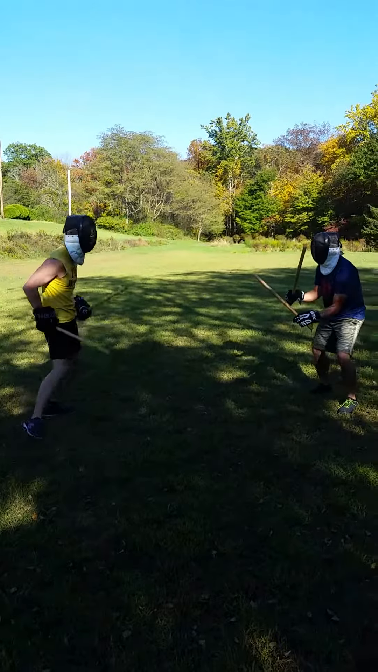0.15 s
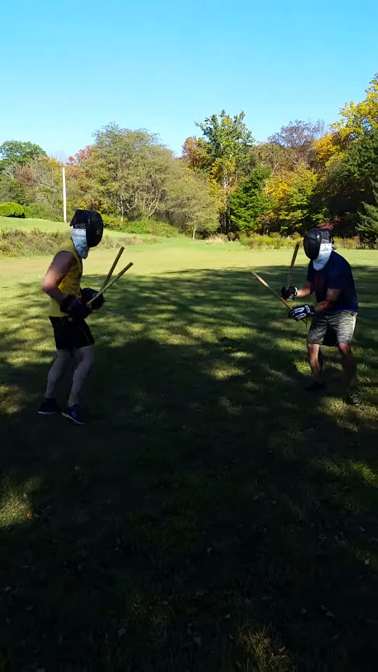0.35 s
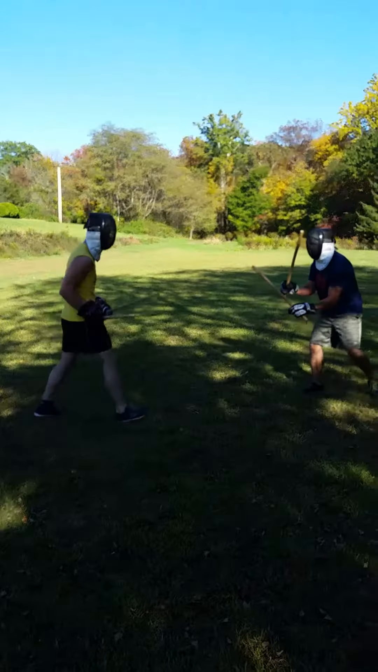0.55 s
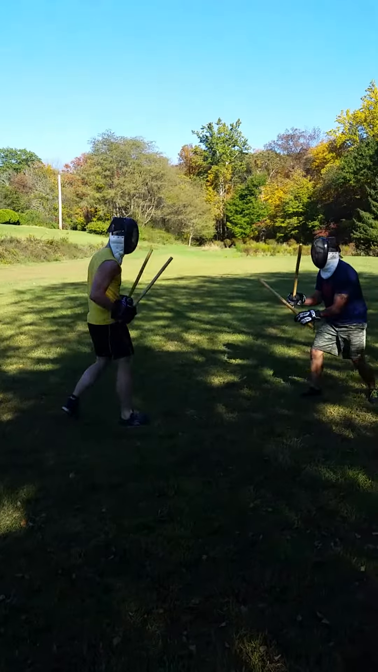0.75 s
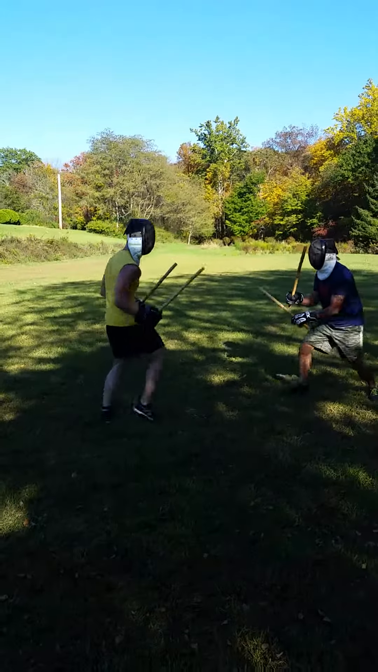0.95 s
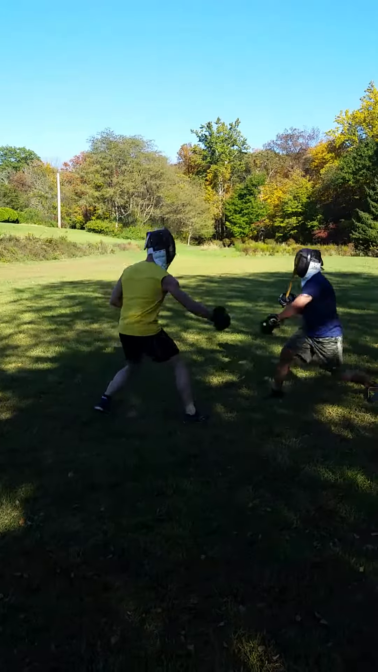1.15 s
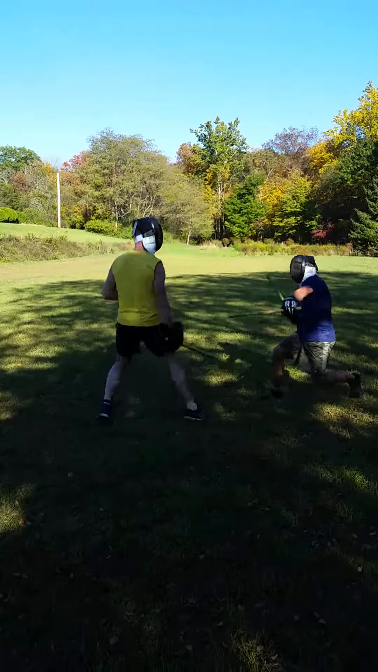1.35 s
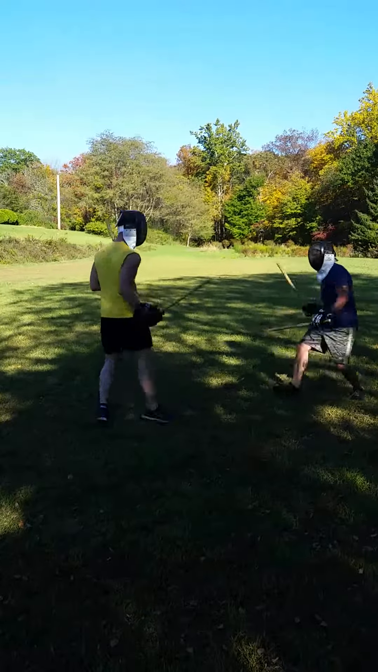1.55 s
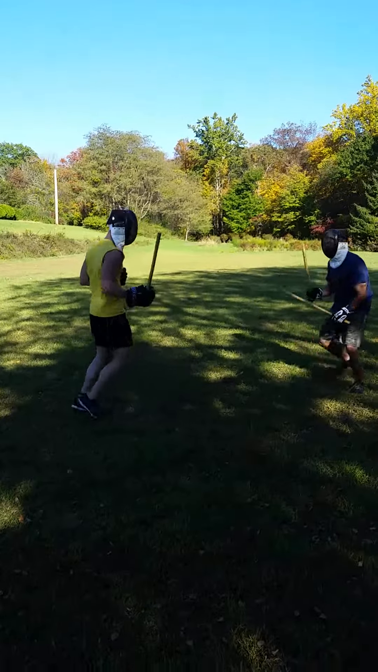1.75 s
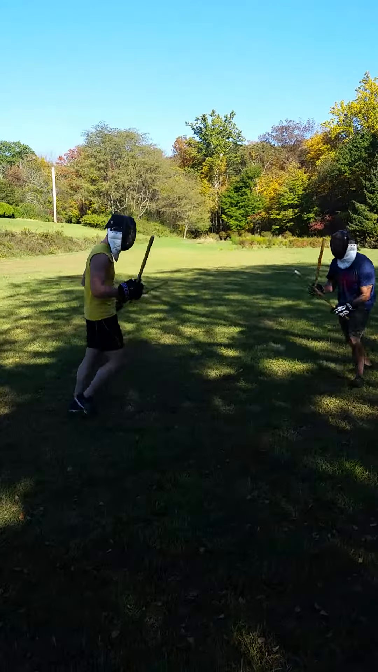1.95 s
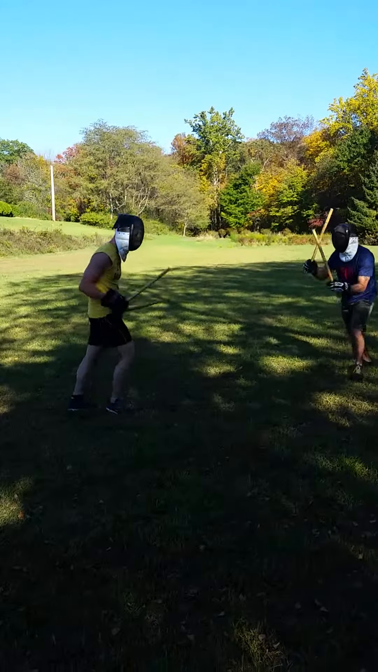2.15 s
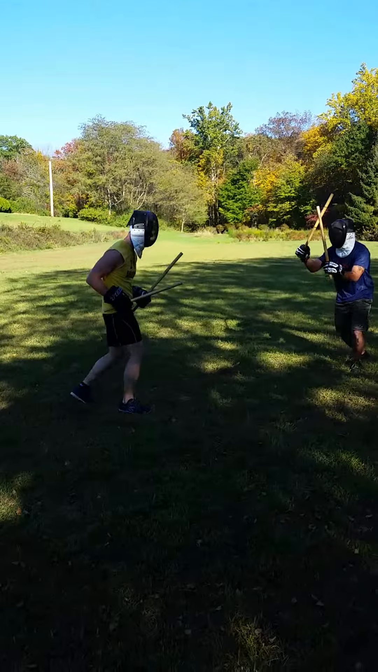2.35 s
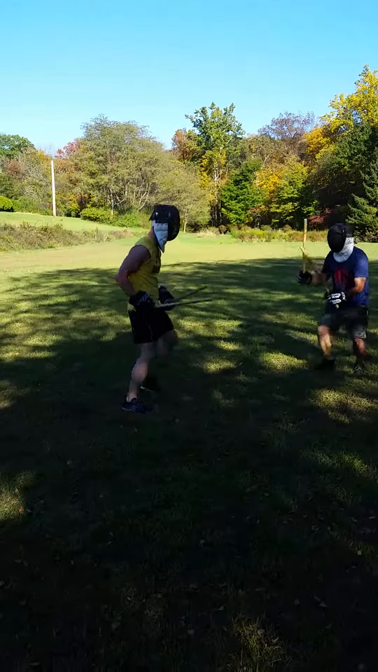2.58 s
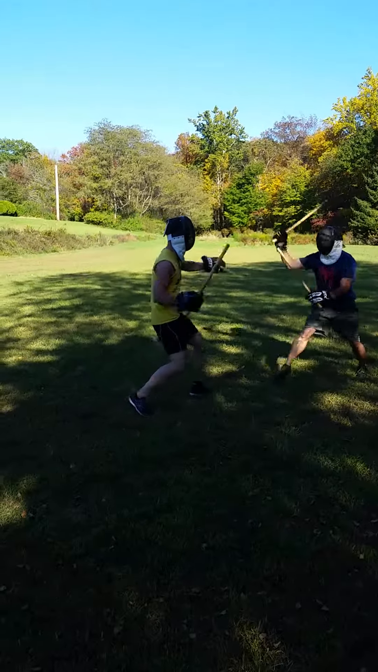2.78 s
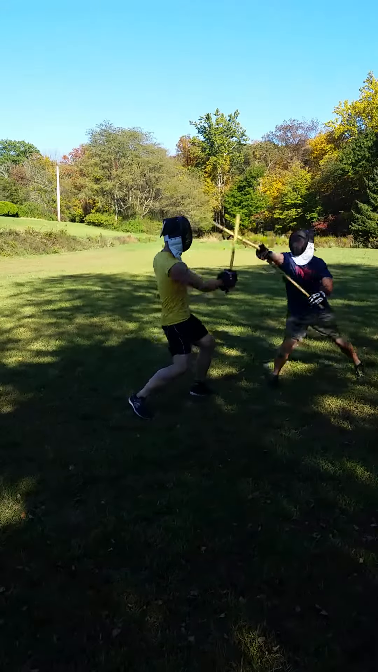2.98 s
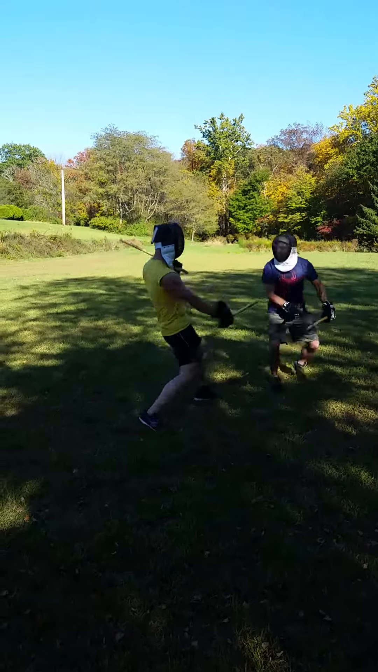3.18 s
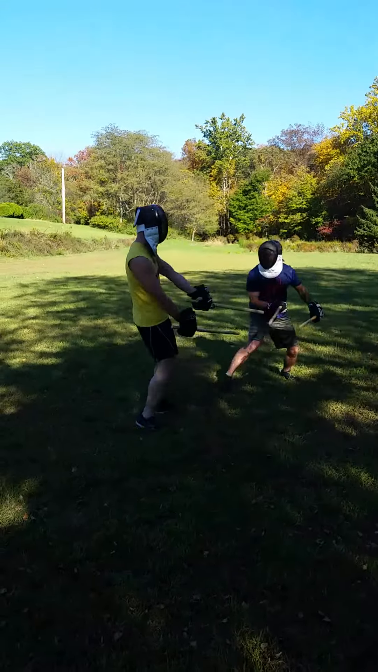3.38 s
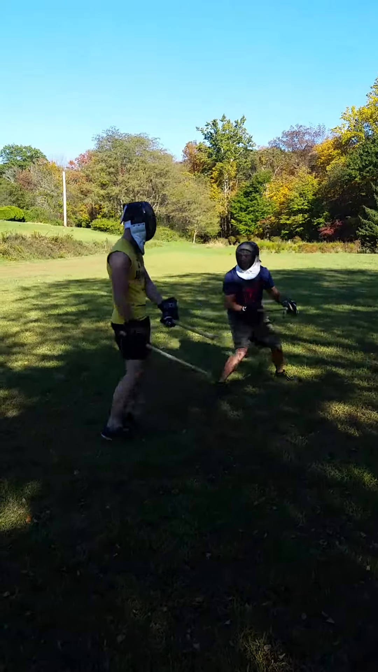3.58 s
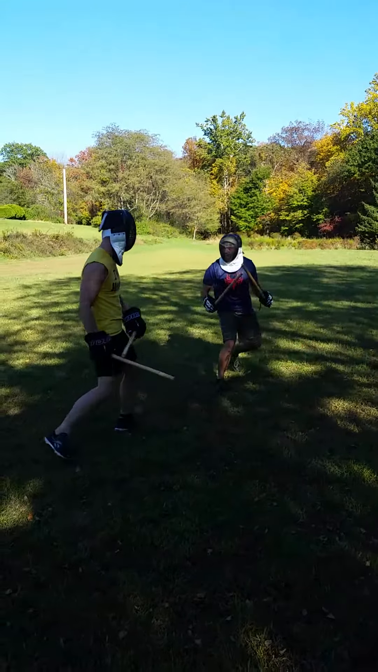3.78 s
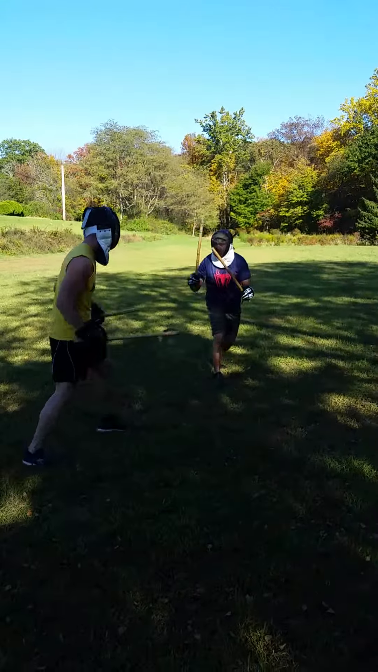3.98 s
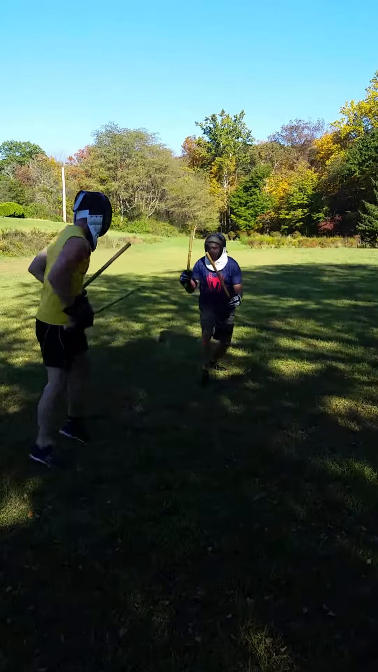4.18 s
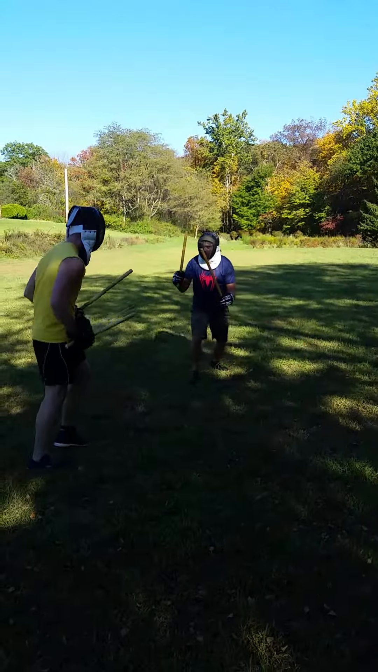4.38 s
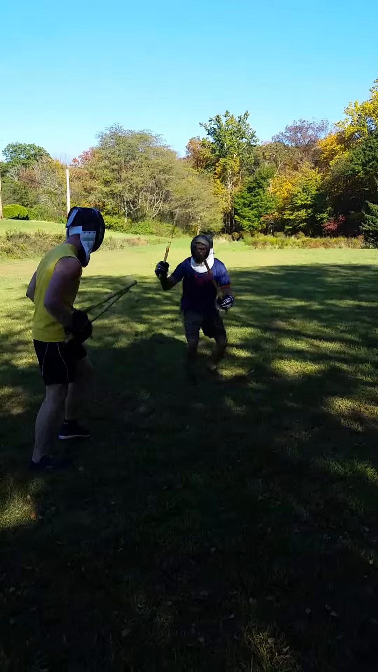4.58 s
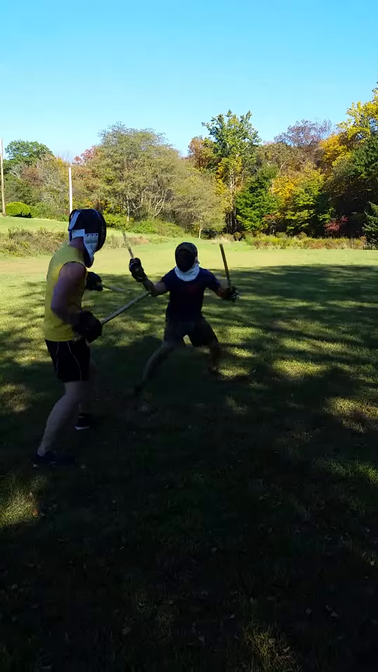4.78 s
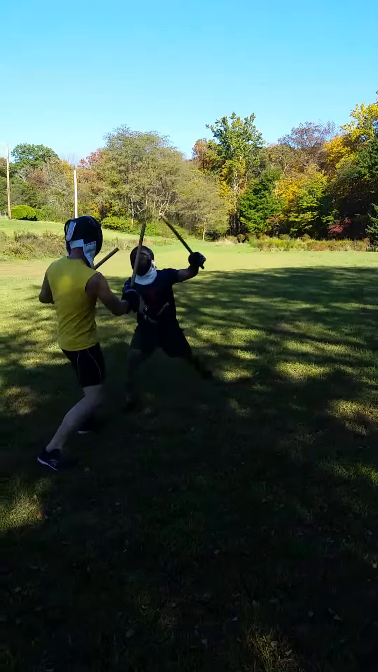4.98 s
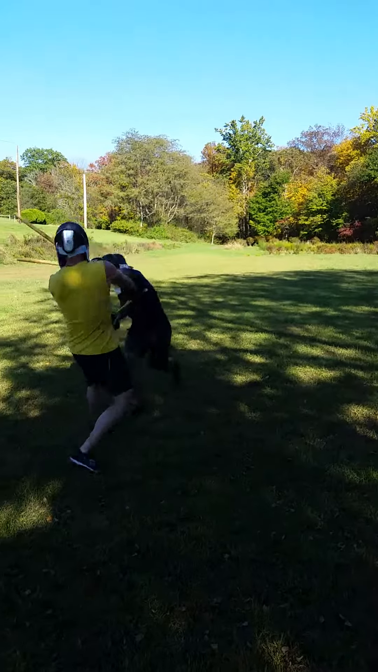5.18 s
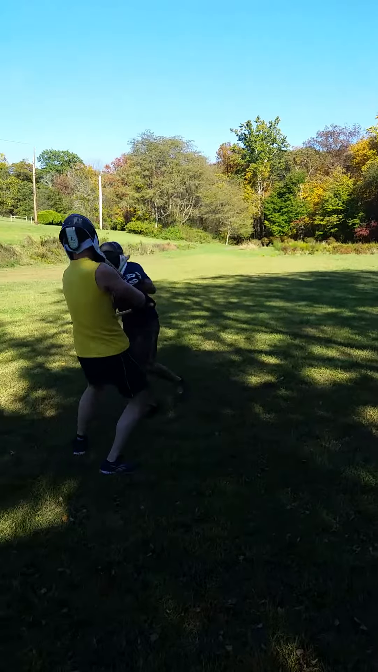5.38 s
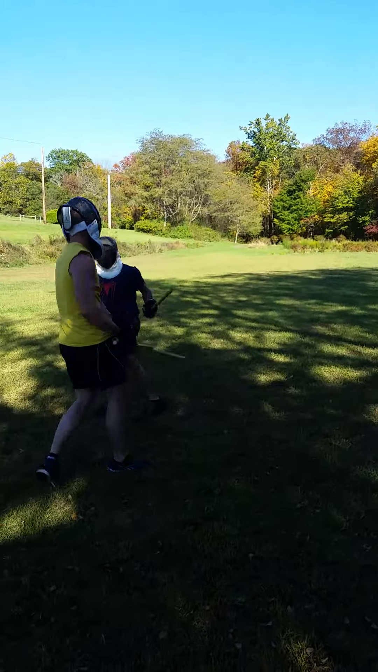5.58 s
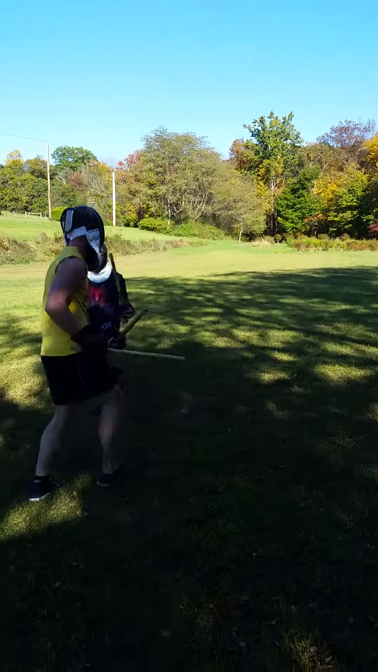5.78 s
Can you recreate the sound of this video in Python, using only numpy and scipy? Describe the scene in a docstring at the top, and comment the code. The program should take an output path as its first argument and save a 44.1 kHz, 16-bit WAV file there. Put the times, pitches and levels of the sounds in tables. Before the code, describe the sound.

Over a low handling rumble and a faint trill of insects, two wooden sticks clack sharply in three irregular bursts, the last being the longest. Feet thud on turf and the sticks swish softly between hits, with a light echo from distant trees. The field is heard clearly on the left and muffled on the right, where a hand bumps the microphone, loudest after the first burst and again during the last.

```python
"""Wooden sticks clack as two fighters spar on grass: each blow cracks and sets both sticks ringing,
and the ground, nearby foliage and far tree line scatter it back. Sticks, clothes and feet swish and
thud, and one cricket sings close by. Distant insects, outdoor hush and microphone hiss dip and return
as the gain of the hand-held camera shifts. Its open left port hears the field, while the covered
right port hears it muffled and picks up the rumble and bumps of the hand."""
import sys
import numpy as np
from scipy import signal
from scipy.fft import rfft, irfft
from scipy.io import wavfile

SR = 44100
rng = np.random.default_rng(int(sys.argv[2]) if len(sys.argv) > 2 else 0)


def wav_out(sig):
    """Save sig, one row per channel (or a flat mono array), as 16-bit PCM at SR to the path in sys.argv[1]."""
    wavfile.write(sys.argv[1], SR, np.round(np.clip(np.atleast_2d(sig).T, -1, 1) * 32767).astype(np.int16))


N = 257544

# Stick clacks, and one sharp slap back off the foliage at 3.13 s.
# The contact point is a share of the stick's length; the grip shifts the pitch:
# start_s, level_db, body_db, brightness_db, contact_share, pitch_ratio, echo_db
CLACKS_AND_SLAP = [(1.288, -25.5, -1, 4.5, 0.099, 1.01, 3), (1.3315, -28.5, 11, -3, 0.061, 1.05, -11),
                   (1.3961, -40, 0.5, -21, 0.29, 1.17, 8), (2.944, -61.5, -1, 12.5, 0.25, 0.78, 4),
                   (3.0936, -27, -7.5, 4.5, 0.23, 1.01, 3), (3.1333, -37, -2.5, 7.5, 0.024, 0.92, -17),
                   (3.4737, -24.5, -6, -6, 0.017, 0.95, -1), (3.926, -58, -8, -8, 0.45, 1.0, 4),
                   (4.688, -54, 4.5, -15, 0.071, 0.93, -4), (4.7072, -38.5, -1, -12.5, 0.098, 0.92, -2),
                   (4.9818, -24.5, -5.5, -1, 0.294, 0.96, 8), (5.0118, -28.5, -5.5, 2.5, 0.51, 1.006, 3.5),
                   (5.1929, -34.5, 1.5, -4, 0.45, 0.99, -3), (5.281, -31, -1.5, 4, 0.46, 0.98, -4),
                   (5.3098, -37.5, -2.5, -8, 0.43, 1.06, 1), (5.433, -28.5, 4, -4, 0.039, 1.066, 1.5)]
# Centres of a clack's body, middle, edge and snap: frequency_hz
CLACK_BANDS_HZ = [600, 1800, 4000, 7500]
# Bending modes of each stick, lowest first: pitch_hz, level_db
FIRST_STICK_MODES = [(230.0, -9), (612.0, -0.5), (1089.0, -2), (1688.0, 1.5), (2202.0, -2), (2851.0, -5),
                     (3596.0, -41.5), (4297.0, -7.5), (5203.0, -12), (6697.0, -10), (7785.0, 1)]
SECOND_STICK_MODES = [(368.0, -7), (718.0, 1), (1240.0, -3.5), (1534.0, -7), (2086.0, -11), (2425.0, -5.5),
                      (3144.0, -5.5), (3806.0, -1.5), (4498.0, -4.5), (5850.0, -7), (8449.0, -6.5)]
# Wooden tone common to all clacks: frequency_hz, gain_db
WOOD_TONE = [(60, -26.5), (150, 5.5), (280, 3.5), (420, 4.5), (620, 5), (2000, 6.5), (5000, 7.5),
             (8500, 1.5), (10000, -9.5), (15000, -13)]
# Tone of the echoes from nearby foliage and from the far tree line: frequency_hz, gain_db
FOLIAGE_TONE = [(200, -5), (700, -0.5), (1500, -3.5), (3000, -1.5), (4300, -1), (5400, -3.5), (6400, -2.5),
                (8500, 0.5), (14000, -3)]
TREE_LINE_TONE = [(200, -28), (700, -2), (2200, -0.5), (4000, -8.5), (8000, -10.5), (14000, -14)]

# Feet on turf and blows on padding: start_s, level_db, pitch_hz, hardness_db
SOFT_IMPACTS = [(.77, -31.5, 100, -23), (1.235, -33, 124, -20), (1.332, -17, 220, -22),
                (1.399, -28.5, 177, -18), (5.062, -28, 140, -12)]
# Sticks cutting the air; shoes and cloth brushing the grass: centre_s, length_s, level_db
STICK_SWINGS = [(0.987, 0.014, -50), (2.804, 0.084, -45), (4.691, .012, -42)]
GRASS_RUSTLES = [(.985, .05, -59), (1.19, 0.079, -58.5), (2.793, 0.31, -59), (3.792, 0.12, -60),
                 (4.704, 0.16, -64)]
# Spectra of that rushing air and brushed grass: frequency_hz, level_db
AIR_SPECTRUM = [(100, -8.5), (400, -3), (750, 1.5), (1400, -4), (2200, -20), (5000, -13.5), (10000, -45)]
GRASS_SPECTRUM = [(1000, 10.5), (3000, 1.5), (5000, -2), (8300, 6.5), (10000, -1.5), (15000, -5.5)]

# The hand bumps the camera: start_s, level_db, pitch_hz, hardness_db
HAND_BUMPS = [(2.129, -21, 68, -55), (2.1995, -3, 73.4, 3), (2.693, -20.5, 75, -1), (3.5715, -18, 69, 2),
              (5.291, -26.5, 90, 7), (5.3165, -9.5, 95.4, -27), (5.4535, -6.5, 97, -39)]
# The camera shell dulls each bump: frequency_hz, gain_db
SHELL_TONE = [(20, 20), (60, 3), (400, -3), (900, 5.5), (1500, -19.5), (4000, -24), (15000, -48)]
# How much the hand shifts on the camera: time_s, level_db
RUMBLE_LEVEL = [(0, -34), (0.6, -35.5), (0.92, -31), (1.2, -36.5), (2.0, -38), (2.72, -30), (3.15, -34),
                (3.35, -39), (4.0, -40), (4.15, -33), (4.55, -28.5), (5.1, -31.5), (5.84, -38.5)]
# Rumble of the shifting hand: frequency_hz, level_db
RUMBLE_SPECTRUM = [(20, -5), (35, -3.5), (70, 1), (100, -5.5), (125, -12), (180, -26), (250, -38),
                   (500, -46), (1200, -57), (3000, -62.5), (6000, -79), (15000, -78)]
# Paths through the body to the open port, and through the cover to the other: frequency_hz, gain_db
BODY_LEAK = [(60, -40.5), (150, -36), (320, -30.5), (480, -36), (800, -44), (15000, -43)]
PORT_COVER = [(100, -3), (700, -9.5), (1200, -14), (2500, -18.5), (4500, -30.5), (8000, -47.5),
              (15000, -19)]

# The whole background dips and returns as the camera's gain shifts, and the hush also fades over the first half
# second; one curve for the treble (insects, microphone hiss), one for the hush: time_s, gain_db
TREBLE_GAIN = [(0, -58.5), (0.7, -65.5), (1.2, -58), (2.1, -63.5), (3.05, -59.5), (3.35, -69.5),
               (4.05, -74), (4.6, -61.5), (5.3, -59), (5.84, -67.5)]
HUSH_GAIN = [(0, -56), (0.5, -65), (1.6, -62), (2.2, -66.5), (3.0, -64.5), (3.35, -68.5), (4.05, -70.5),
             (4.9, -64.5), (5.3, -58.5), (5.84, -60)]
# Background spectra of insects, hush, low drone and microphone hiss: frequency_hz, level_db
INSECT_SPECTRUM = [(2500, -40.5), (3400, -11.5), (3850, -1), (4100, -0.5), (4400, -3), (5300, -16.5),
                   (8000, -42), (9500, -44.5)]
HUSH_SPECTRUM = [(30, 2.5), (65, 11), (100, 4), (170, -5.5), (260, 3.5), (500, -0.5), (1300, -5.5),
                 (2000, -13), (3200, -16), (5500, -23.5), (8000, -18.5), (10000, -33), (15000, -28)]
DRONE_SPECTRUM = [(90, -43.5), (112, -13.5), (124, -4), (136, -12), (165, -43), (400, -87)]
MIC_HISS_SPECTRUM = [(1000, -4), (6000, -8.5), (8000, -13.5), (10500, -11), (13000, -1.5), (15500, -3)]


def clacks(crack_db=2, crack_t60_s=0.038, tick_db=8, tick_s=0.00015, snap_db=-8.5, snap_share=0.45):
    """Both sticks ring under a noisy crack; returns the direct sound and what goes out to the trees."""
    direct, outgoing = np.zeros(N), np.zeros(N)
    t = np.arange(SR // 10) / SR
    for start_s, level_db, body_db, bright_db, contact_share, pitch_ratio, echo_db in CLACKS_AND_SLAP:
        ring = stick_ring(FIRST_STICK_MODES, contact_share, pitch_ratio, t)
        # the second stick is met a little further from its tip
        ring += stick_ring(SECOND_STICK_MODES, contact_share + 0.11, pitch_ratio, t)
        # the rough surfaces meet in many tiny impacts of unequal size
        impacts = unit_rms(rng.choice([-1, 1], len(t)) * rng.random(len(t)) ** 6)
        crack = gain_of(crack_db) * impacts * contact_decay(t, crack_t60_s)
        tick = gain_of(tick_db) * np.exp(-t / tick_s) * rng.choice([-1, 1], len(t))
        clack = ring + crack + tick
        tone = list(zip(CLACK_BANDS_HZ, [body_db, 0, bright_db, snap_db + snap_share * bright_db]))
        add(direct, start_s, gain_of(level_db) * colour(clack, tone))
        # summed over all directions, the short ring blurs into one pulse of the same energy
        pulse = np.linalg.norm(clack) * (t == 0)
        add(outgoing, start_s, gain_of(level_db + echo_db) * colour(pulse, tone))
    return colour(direct, WOOD_TONE), colour(outgoing, WOOD_TONE)


def stick_ring(modes, contact_share, pitch_ratio, t, t60_at_2khz_s=0.031, damping=0.13):
    """A gripped stick rings briefly, high modes dying sooner; modes struck near a node stay quiet."""
    mode_hz, mode_db = np.transpose(modes)[:, :, None]
    order = np.arange(len(modes))[:, None] + 1
    shape = np.cos((order + .5) * np.pi * contact_share + np.pi / 4)
    waves = np.sin(2 * np.pi * (mode_hz * pitch_ratio * t + rng.random(mode_hz.shape)))
    decay = contact_decay(t, t60_at_2khz_s * (mode_hz / 2000) ** -damping)
    return (gain_of(mode_db) * shape * waves * decay).sum(0)


def contact_decay(t, t60_s, hold_s=0.002):
    """The level holds while the sticks chatter against each other, then dies away."""
    return gain_of(-60 * np.maximum(t - hold_s, 0) / t60_s)


def echoes(direct, outgoing, ground_db=-23, foliage_db=-14, tree_line_db=-20):
    """Clacks return to the microphone off the ground, the crowns close by and the far tree line."""
    ground_tone = [(200, 0.32), (8000, 1.0)]  # frequency_hz, gain_db
    ground = scatter(direct, ground_tone, delay_s=0.0019, rise_s=0.0095, t60_s=0.045, air_hz=12000)
    near = scatter(outgoing, FOLIAGE_TONE, delay_s=0.022, rise_s=0.04, t60_s=0.24, air_hz=14000)
    far = scatter(outgoing, TREE_LINE_TONE, delay_s=0.1, rise_s=0.028, t60_s=1.2, air_hz=5190)
    return gain_of(ground_db) * ground + gain_of(foliage_db) * near + gain_of(tree_line_db) * far


def scatter(sound, tone, delay_s, rise_s, t60_s, air_hz):
    """Countless small echoes arrive in clumps; air takes the treble from the late ones."""
    size = SR * 3 // 2
    t = np.maximum(np.arange(size) / SR - delay_s, 0)
    clumps = (waver(90, 1.8) * waver(22, 1.3))[:size]
    taps = rng.standard_normal(size) * clumps * (1 - np.exp(-t / rise_s))
    hz, frame_s, spectra = signal.stft(taps, SR, nperseg=256)
    air_loss = np.sqrt(1 + (hz[:, None] / air_hz) ** 2)
    fall_db = 60 * np.maximum(frame_s - delay_s, 0) / t60_s * air_loss
    tail = signal.istft(spectra * gain_of(-fall_db), SR, nperseg=256)[1]
    tail /= np.linalg.norm(tail)
    return colour(signal.fftconvolve(sound, tail)[:N], tone)


def thuds(hits, push_s=0.0015, overtone_ratio=2.45, t60_cycles=8.8):
    """A short push, then a low, damped rebound; a harder thud has more push and more overtone."""
    mix = np.zeros(N)
    t = np.arange(SR // 4) / SR
    push_time = t / push_s
    push = push_time ** 2 * (1 - push_time / np.pi) * np.exp(-push_time) * 2 * np.e
    onset = 1 - np.exp(-(push_time / 2) ** 2)
    for start_s, level_db, pitch_hz, hardness_db in hits:
        phase = 2 * np.pi * pitch_hz * t
        fade = gain_of(-60 * pitch_hz * t / t60_cycles)
        overtone = gain_of(hardness_db) * np.sin(overtone_ratio * phase) * fade ** overtone_ratio
        rebound = (np.sin(phase) * fade + overtone) * onset
        push_db = -9 + 0.15 * hardness_db
        add(mix, start_s, gain_of(level_db) * (gain_of(push_db) * push - rebound))
    return mix


def swishes(grain_db=3):
    """Air rushes past the swung sticks; shoes and cloth make a grainy rustle in the grass."""
    swings = sum(swell(*row) for row in STICK_SWINGS)
    rustles = sum(swell(*row) for row in GRASS_RUSTLES)
    air = unit_rms(noise(AIR_SPECTRUM) * waver(75, grain_db))
    grass = unit_rms(noise(GRASS_SPECTRUM) * waver(160, grain_db))
    return swings * air + rustles * grass


def handling(rumble_db=1.0):
    """Right at the microphone, the hand shifts on the camera body: a lumpy rumble and a few bumps."""
    rumble = gain_of(rumble_db) * envelope(RUMBLE_LEVEL) * noise(RUMBLE_SPECTRUM) * waver(7.7, 1.46)
    return rumble + colour(thuds(HAND_BUMPS), SHELL_TONE)


def cricket(wing_hz=4040, jitter_hz=25, strokes_per_s=33.7, steady_db=-77):
    """One cricket near the microphone swells once; each wing stroke gives a short, unsteady whistle."""
    strokes = strokes_per_s * np.arange(N) / SR
    gate = np.exp(-((strokes % 1 - .5) / .22) ** 2)
    pitch_hz = wing_hz + jitter_hz * noise([(100, 0), (300, -40)])
    whistle = np.sin(2 * np.pi * np.cumsum(pitch_hz) / SR)
    effort = gain_of(steady_db) + swell(centre_s=4.59, length_s=0.34, level_db=-64)
    return effort * unit_rms(gate * whistle)


def field_ambience(hush_db=5.0, insects_db=-1.0, drone_db=-55, drone_fade_db_per_s=1.5):
    """The outdoor hush all around, insects trilling in the distance and a low drone slowly fading."""
    hush = gain_of(hush_db) * envelope(HUSH_GAIN) * noise(HUSH_SPECTRUM) * waver(16, 0.63)
    insects = gain_of(insects_db) * envelope(TREBLE_GAIN) * noise(INSECT_SPECTRUM) * waver(35, 1.3)
    drone = gain_of(drone_db - drone_fade_db_per_s * np.arange(N) / SR) * noise(DRONE_SPECTRUM)
    return hush + insects + drone


def microphone_hiss(hiss_db=-12):
    """A thin high hiss, unrelated in the two ports, that dips and returns with the camera's gain."""
    hiss = np.array([noise(MIC_HISS_SPECTRUM) for port in range(2)])
    return gain_of(hiss_db) * envelope(TREBLE_GAIN) * hiss


def gain_of(db):
    """Decibels to amplitude."""
    return 10 ** (np.asarray(db) / 20)


def unit_rms(sound):
    """Scales to an rms of one."""
    return sound / np.sqrt(np.mean(sound ** 2) + 1e-20)


def gain_at(spectrum, hz):
    """The gain of a spectrum at hz, interpolated on a log-frequency axis."""
    frequency_hz, level_db = np.transpose(spectrum)
    return gain_of(np.interp(np.log(hz + 1), np.log(frequency_hz + 1), level_db))


def envelope(points):
    """Points of time_s, level_db as a gain for every sample."""
    return gain_of(np.interp(np.arange(N) / SR, *np.transpose(points)))


def swell(centre_s, length_s, level_db):
    """A bell-shaped rise and fall, as a gain for every sample."""
    return gain_of(level_db) * np.exp(-(2 * (np.arange(N) / SR - centre_s) / length_s) ** 2)


def add(mix, start_s, sound):
    """Adds a sound to the mix at start_s."""
    part = mix[max(round(start_s * SR), 0):][:len(sound)]
    part += sound[:len(part)]


def colour(sound, tone, size=2048):
    """Causal filter with the given tone, so that attacks stay sharp."""
    log_gain = np.log(gain_at(tone, abs(np.fft.fftfreq(size, 1 / SR))))
    minimum_phase = np.exp(np.conj(signal.hilbert(log_gain)))
    taps = np.fft.ifft(minimum_phase).real
    return signal.fftconvolve(sound, taps[:size // 2])[:len(sound)]


def noise(spectrum):
    """Steady noise with the given spectral shape and an rms of one."""
    white = rfft(rng.standard_normal(N))
    return unit_rms(irfft(white * gain_at(spectrum, np.fft.rfftfreq(N, 1 / SR)), N))


def waver(rate_hz, depth_db):
    """A random gain that flutters at up to about rate_hz."""
    return gain_of(depth_db * noise([(rate_hz, 0), (2 * rate_hz, -80)]))


def scene():
    """Open port left, covered port right; near sounds are shared, diffuse ones reach each differently."""
    direct, outgoing = clacks()
    near = direct + cricket() + swishes() + thuds(SOFT_IMPACTS)
    left, right = (near + echoes(direct, outgoing) + field_ambience() for port in range(2))
    hand = handling()
    open_port = left + colour(hand, BODY_LEAK)
    covered_port = colour(right, PORT_COVER) + hand
    return np.array([open_port, covered_port]) + microphone_hiss()


def record(dry, cutoff_hz=16000):
    """The camera cuts off the highest treble in both channels."""
    taps = signal.firwin(511, cutoff_hz, window=("kaiser", 9), fs=SR)
    return signal.oaconvolve(dry, taps[None], "same")


dry = scene()
out = record(dry)
wav_out(out)
```